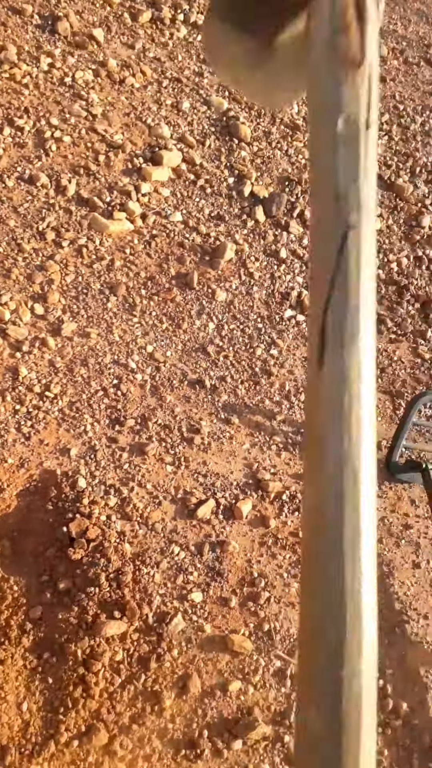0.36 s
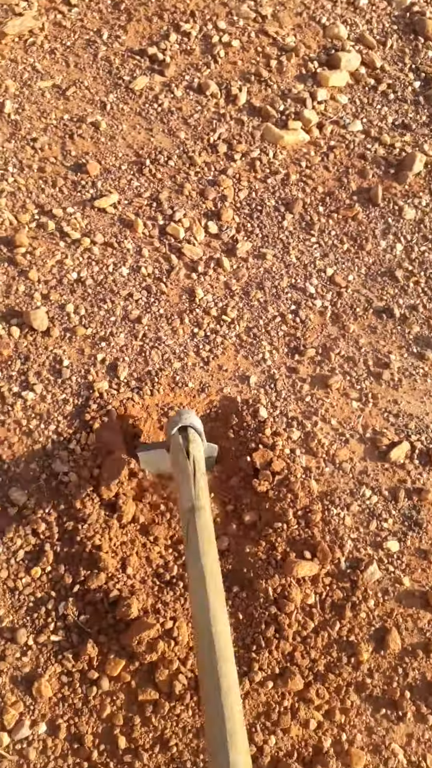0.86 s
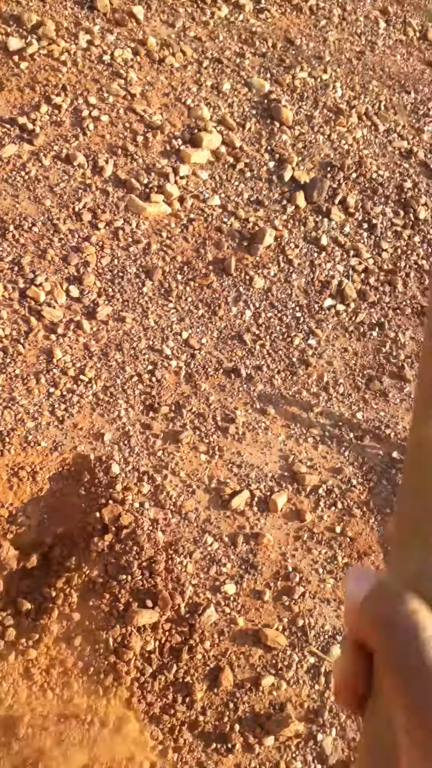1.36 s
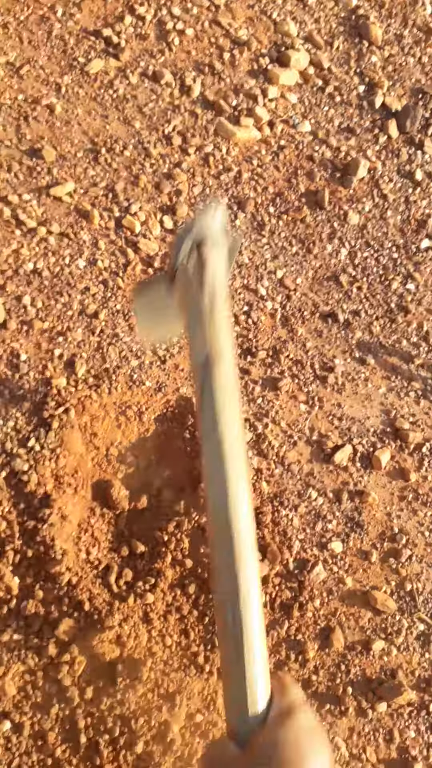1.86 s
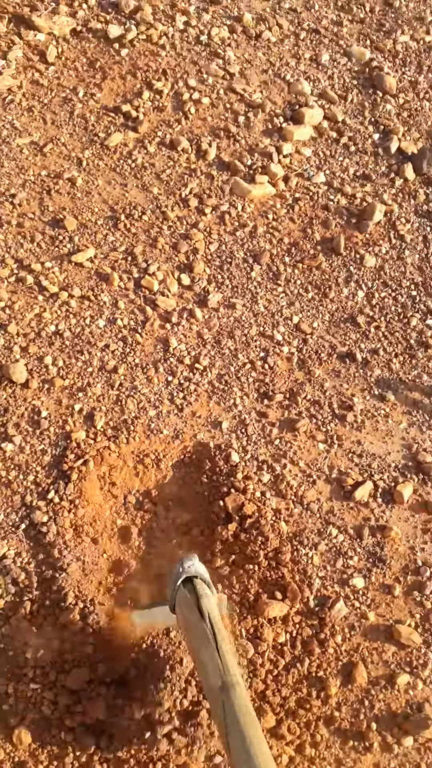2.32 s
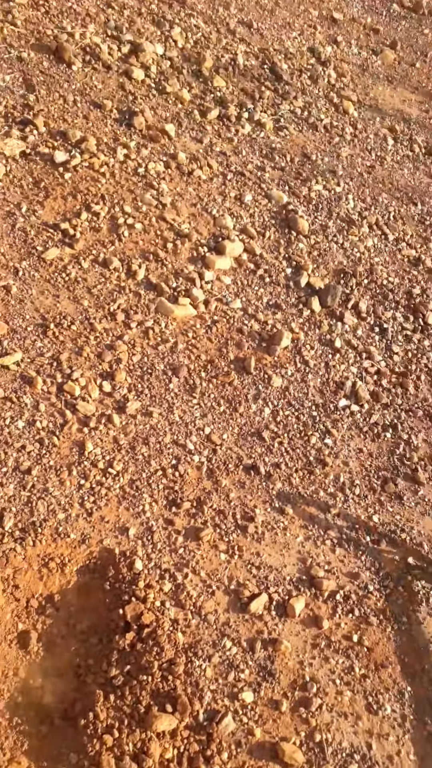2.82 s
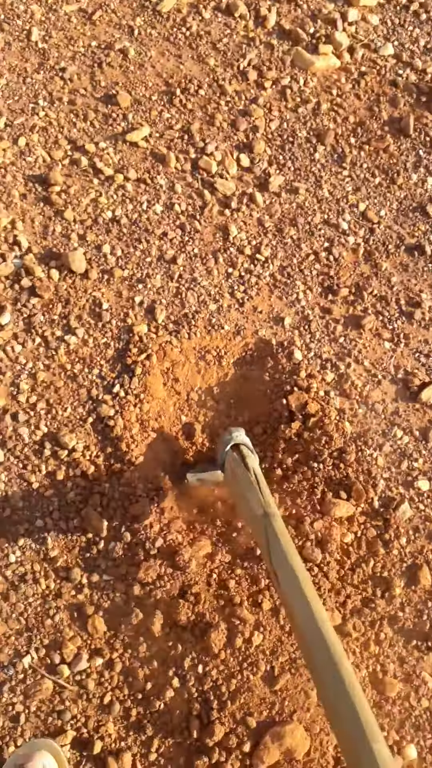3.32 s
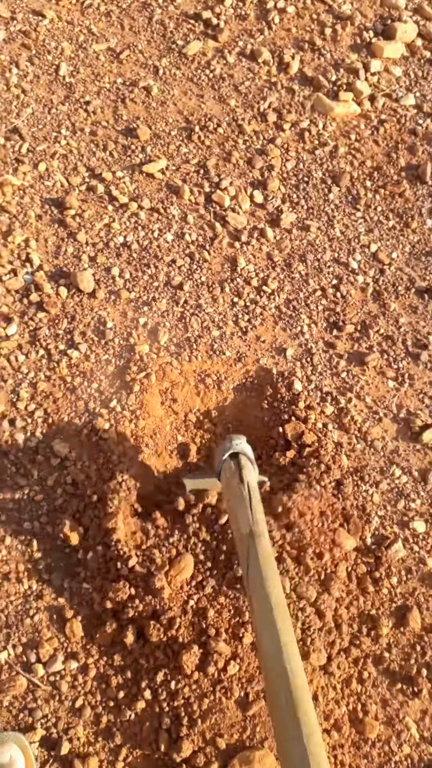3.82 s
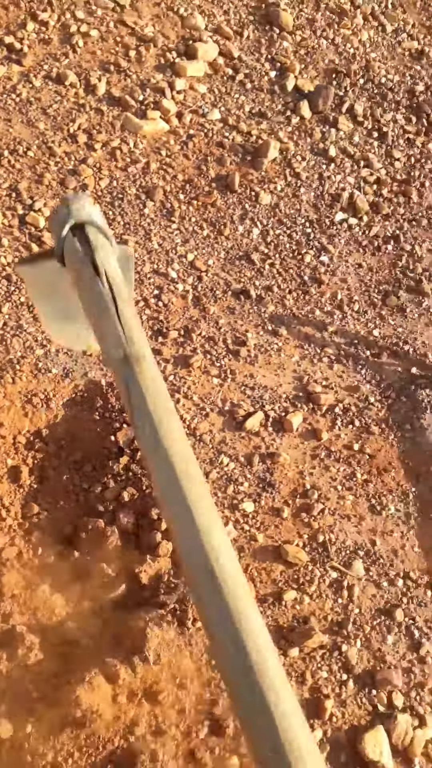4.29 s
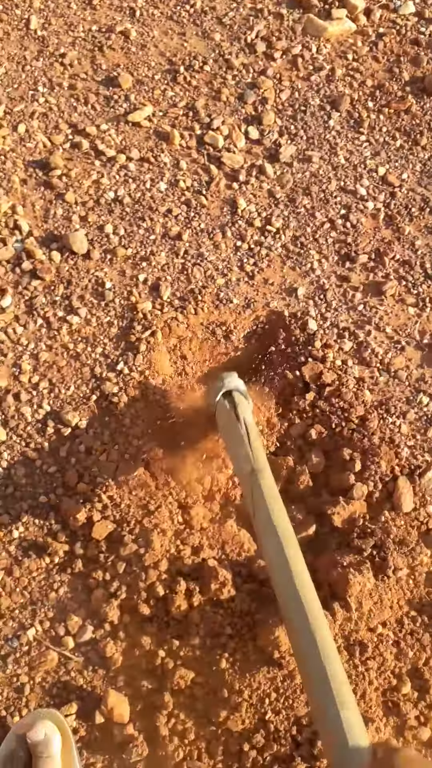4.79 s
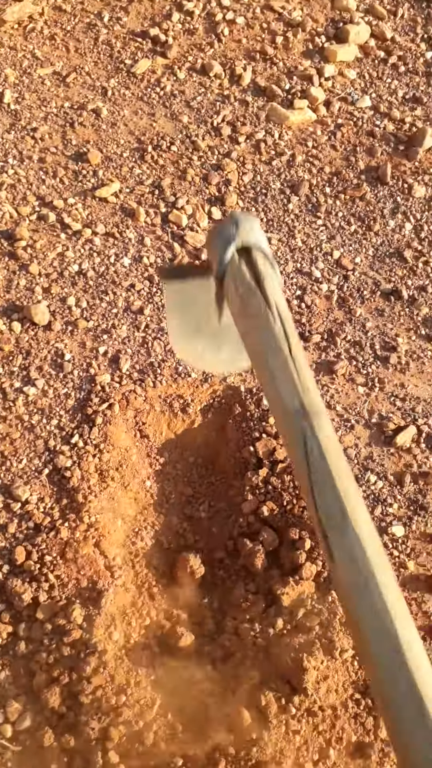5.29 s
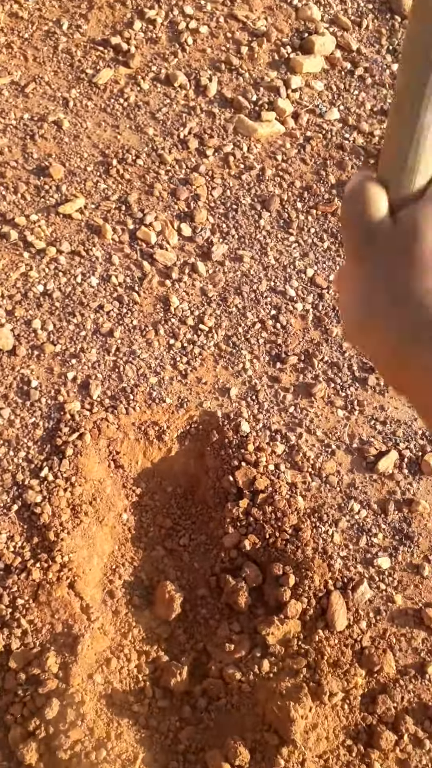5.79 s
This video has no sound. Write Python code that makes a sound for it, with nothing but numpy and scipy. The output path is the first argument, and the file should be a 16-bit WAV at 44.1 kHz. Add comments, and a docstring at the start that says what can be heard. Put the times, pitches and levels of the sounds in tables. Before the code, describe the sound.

A steel hoe chops into hard stony ground outdoors, each sharp crunch followed by scraping gravel and a patter of sand and pebbles.

```python
"""Hoe blows in stony ground

A steel hoe chops and drags through hard stony ground outdoors, close to the microphone.
Dense clicks drive resonances as stones crush and the ground knocks and thumps; decaying sines ring the blade.
Filtered and resonated clicks also make the dragged gravel, cracking stones, sand, grit and clods.
Filtered noise makes the rush of each swing and the light wind rumbling on the microphone."""
import sys
import numpy as np
from scipy import signal
from scipy.fft import rfft, irfft
from scipy.io import wavfile

SR = 44100
rng = np.random.default_rng(int(sys.argv[2]) if len(sys.argv) > 2 else 0)


def level_to_linear(level):
    """Convert decibel levels to linear amplitude factors, elementwise."""
    exponent = np.asarray(level, float) / 20
    return 10 ** exponent


def wav_record(signal):
    """Record a signal, one row per channel, as 16-bit PCM in the file named by sys.argv[1]."""
    frames = np.transpose(np.atleast_2d(signal))
    bounded = np.clip(frames, -1, 1)
    # unit amplitude maps onto the largest positive 16-bit level
    quanta = np.round(bounded * 32767).astype(np.int16)
    wavfile.write(sys.argv[1], SR, quanta)


N = 271258  # samples

# Blade bites: t/s, crush peak level/dB, crush resonance f/Hz, knock level/dB, knock f/Hz, thump level/dB
BITES = [(0.8658, -6.5, 6420, -22, 1200, -32), (1.9058, -3.5, 3830, -15.5, 900, -22),
         (3.1952, 0.5, 7850, -18.5, 800, -18), (4.6973, -8.5, 4290, -36, 587, -40),
         (4.7034, -7, 8160, -23.5, 525, -38.5), (4.7126, -7, 2690, -15, 500, -41),
         (4.7223, -8.5, 2290, -18, 1920, -42.5), (4.7316, -9.5, 3350, -21, 1090, -43),
         (4.8475, -16, 2200, -19.5, 756, -38), (4.8915, -16.5, 4464, -21, 540, -43),
         (4.8961, -9.5, 6080, -14.5, 735, -38), (4.967, -12, 2610, -36, 1920, -48),
         (5.9582, 2.5, 7700, -17, 1500, -25)]
# Spectrum of crushing stones: f/Hz, relative density level/dB
CRUSH_SPECTRUM = [(470, -22.5), (800, -13.5), (2180, -6.5), (3060, -7), (3980, 0.5), (4460, -1), (7170, -3),
                  (7930, 8.5), (9570, -14.5), (12500, -9), (16000, -27)]
BITE_RISE_S, BITE_T60_S = .0055, .018
BITE_PRESS = 2.2  # gain before limiting at 1: harder pressing holds the crush at full strength longer
CRACK_DB, CRACK_DB_PER_OCTAVE = -13, 6.0  # bright edge against the crush peak at 4 kHz; higher stone is brighter

# Blade modes in the air: f/Hz, relative level/dB, 60 dB decay t/s
BLADE_MODES = [(615, -27, 1.2), (1125, -20, .08), (1615, -5, .17), (2430, -18, .1), (3378, -17, .7),
               (3770, -12, .14), (4382, -12, .19), (4910, -16, .12), (5800, -20, .19), (6450, -14, .09),
               (8300, -15, .1), (8930, -20, .15), (10900, -18, .1), (13350, -18, .12)]
# Touches that ring the blade: t/s, level/dB, centre of struck modes f/Hz, spread/octaves,
# loss to clinging soil/dB per s
TOUCHES = [(.927, -24, 4382, 0.1, 600.), (1.945, -31, 3770, 0.041, 900.), (1.969, -19.5, 5170, 1.7, 698),
           (2.357, -38, 4382, .1, 300.), (2.39, -36, 3360, 0.087, 401), (4.039, -27, 9000, 1.1, 500.),
           (4.732, -10.5, 4010, 0.55, 1500.), (5.113, -31, 3340, 0.078, 20.), (5.136, -15, 3378, 0.06, 260),
           (5.13, -33, 9500, 1.3, 300.), (5.957, -22, 2000, 5.3, -2), (6.032, -35, 3360, 0.76, 98),
           (6.123, -41, 4400, 0.35, 52)]
SLIDING_LOSS_DB_PER_S = 901

# Single stones cracking or landing: t/s, peak level/dB, pitch f/Hz, pitch over crack level/dB
SINGLE_STONES = [(0.0174, -24, 3720, 10), (0.0932, -26, 4900, 22), (0.1226, -26, 4200, 19),
                 (0.1774, -34, 3230, -6), (0.2329, -40, 3400, 18), (0.3102, -32, 5160, -2),
                 (0.4065, -41, 11900, 3), (0.4494, -44, 11900, 0), (0.5352, -39, 12100, -12),
                 (0.6165, -41.5, 12300, -3), (0.7382, -53, 7800, -1), (0.9268, -31, 4530, 3),
                 (0.9464, -31, 4500, 17), (0.9594, -29.5, 1220, -4), (1.05, -46, 4960, 11),
                 (1.1732, -35, 4570, 0), (1.2032, -37, 4500, 19), (1.3129, -46, 5400, 3.0),
                 (1.4084, -37, 12400, 6), (1.4147, -41.5, 4380, -2), (1.43, -43.5, 6300, -1),
                 (1.9694, -34, 1740, -6), (2.0657, -42, 1190, 8), (2.1615, -27.5, 1030, 1),
                 (2.3057, -38, 4360, 4), (2.5227, -43.5, 7550, 13), (2.64, -47, 11000, -3),
                 (2.8809, -52, 4350, 6), (3.0749, -33.5, 12100, -17), (3.2494, -29, 4100, -16),
                 (3.9594, -48, 2550, 1), (4.0392, -31, 11000, 5), (4.1689, -45, 3320, 17),
                 (4.1919, -44, 5350, 11), (4.2911, -28, 6100, 30), (4.3141, -37, 5620, 21),
                 (4.3565, -40.5, 4700, 8), (4.3909, -40.5, 5900, 16), (4.7566, -21, 1930, 17),
                 (4.8064, -22, 700, 3.0), (4.9397, -25.5, 1940, 15.5), (5.1347, -34, 3460, -5),
                 (5.2979, -40, 4790, 16), (5.4176, -31, 4860, 29), (5.466, -45, 5190, 8),
                 (5.4989, -44.5, 5130, 24), (5.6042, -42.5, 8250, 4), (5.808, -56, 2500, -6),
                 (6.0332, -10, 5300, -2), (6.035, -31, 1150, 14)]
STONE_T60_S, STONE_T60_S_PER_DB = .0075, .0003  # decay at -35 dB; bigger stones crack longer
SMALL_STONES_DB, SMALL_STONES_SPREAD_DB = 4.0, 3.5  # peaks over the falling sand

# Strokes of the edge through gravel: hardest grind t/s, gravel level/dB, soil level/dB, build t/s, die t/s
STROKES = [(0.0, -38.5, -45, .01, 0.085), (.125, -46, -56.5, 0.029, 0.054),
           (0.877, -45, -44, 0.0068, 0.028), (.945, -44, -52.5, 0.04, 0.069),
           (1.918, -41.5, -35, 0.011, 0.03), (1.974, -36, -40.5, .012, 0.057), (2.1, -51.5, -52, .03, .06),
           (2.16, -46.5, -46, 0.038, 0.035), (3.21, -42, -38, .01, .05), (3.252, -47, -52, .02, .025),
           (3.85, -56, -66, .04, .1), (3.922, -39.5, -44, 0.037, 0.03), (4.05, -47, -60, .02, 0.072),
           (4.742, -33, -35, .01, .015), (4.775, -26, -37.5, 0.034, 0.044), (4.82, -34, -28, .025, .025),
           (4.847, -31.5, -29.5, 0.029, .012), (4.888, -30.5, -30, 0.017, .01), (4.908, -30, -43, .01, .03),
           (4.945, -34, -42, .01, .03), (4.986, -28, -30, .03, .016), (5.138, -48, -56, .05, .03),
           (5.97, -35, -38, 0.0079, .035), (6.04, -46, -56, .02, 0.054)]
DRAG_SPAN_DB = 15  # what a stroke gains and loses in those times
# Spectrum of grinding gravel: f/Hz, relative density level/dB
GRAVEL_SPECTRUM = [(760, -41), (1300, -20.5), (2600, -4), (3960, -11.5), (5720, -6.5), (6150, -12.5),
                   (8080, -14.5), (9360, -17.5), (16000, -22.5)]

# Loose ground thrown off the blade: thickest sand t/s, hold t/s, sand level/dB, grit level/dB,
# clods level/dB, extra rolling of clods t/s
THROWS_OFF_BLADE = [(.12, .2, -46, -50, -58, .1), (1.203, 0.072, -53, -59, -62, .05),
                    (2.3, .26, -56.5, -59.5, -61, .36), (3.36, .24, -63, -63.5, -70, .05),
                    (4.212, 0.23, -51, -57, -57.5, .3), (5.238, .22, -48, -54, -58.5, .02),
                    (6.12, 0.21, -58.5, -60, -65, .02)]
# How sand falls: lead t/s, rise/dB per s, sag during load/dB per s, fall after it/dB per s, still level/dB
SAND_DESCENT = (0, 70, 14, 85, -76)
# How grit falls: lead over sand t/s, rise/dB per s, sag/dB per s, fall/dB per s, still level/dB
GRIT_DESCENT = (0.16, 200, 24, 80, -82)
# How clods fall: lead over sand t/s, rise/dB per s, sag/dB per s, fall/dB per s, still level/dB
CLODS_DESCENT = (.14, 200, 16, 100, -82)
# Sand slipping off the raised blade: t/s, level/dB
SAND_TRICKLES = [(1.62, -68), (2.88, -64), (3.88, -60), (4.55, -62)]
TRICKLE_DB_PER_S = 110
# Spectrum of sand: f/Hz, relative density level/dB
SAND_SPECTRUM = [(2650, -29.5), (4500, -1.5), (6250, -3), (6880, -2), (9460, -6), (10200, -11), (12600, -2),
                 (16000, -4.5)]
# Spectrum of grit: f/Hz, relative density level/dB
GRIT_SPECTRUM = [(880, -49), (1500, -16), (2190, -4), (3250, -3), (3630, -4), (6070, -2.5), (7000, -9.5),
                 (9100, -41.5), (15400, -120)]
# Spectrum of clods and breaking soil: f/Hz, relative density level/dB
CLODS_SPECTRUM = [(110, -43), (180, -5), (309, -4), (472, 0.5), (833, -9), (972, -2.5), (1200, -15),
                  (1800, -19), (2340, -37), (3960, -120)]

# Downward rushes of the hoe: arrival t/s, level/dB
HOE_SWINGS = [(.86, -76), (1.9, -62), (3.18, -59.5), (4.69, -64), (5.95, -68)]
SWING_DB_PER_S = 150
# Spectrum of rushing air: f/Hz, relative density level/dB
SWISH_SPECTRUM = [(100, -30.5), (250, -4), (450, 0), (900, -8), (1500, -30), (3000, -60)]
# Wind on the microphone: t/s, level/dB
WIND_LEVELS = [(0, -39), (.03, -45), (.06, -37), (.085, -51), (.2, -60), (.4, -61), (.57, -55), (.79, -59),
               (.84, -66), (.92, -60), (1.11, -63), (1.35, -69), (1.68, -79), (2.11, -66.5), (2.33, -62),
               (2.45, -74.5), (2.56, -74), (2.65, -56), (2.76, -68), (3.02, -74), (3.08, -57), (3.25, -68),
               (3.6, -81), (4.01, -66), (4.2, -66), (4.27, -79), (4.68, -72), (4.85, -64), (5.0, -66.5),
               (5.6, -76.5), (5.84, -72), (5.885, -58.5), (5.93, -63), (6.15, -70)]
# Spectrum of wind rumble: f/Hz, relative density level/dB
WIND_SPECTRUM = [(13, -51.5), (22, -22), (58, -2.5), (97, -1), (144, -2), (194, -12.5), (300, -19),
                 (390, -54), (660, -120)]


def rms_one(x):
    """Normalisation: mean power is brought to 1."""
    return x / np.sqrt(np.mean(x ** 2) + 1e-20)


def coloured(x, spectrum):
    """Minimum phase: a folded cepstrum gives the earliest causal response; rms gain 1 for white input."""
    hz = np.maximum(np.fft.rfftfreq(4096, 1 / SR), 10)
    point_hz, point_db = np.transpose(spectrum)
    log_gain = np.interp(np.log(hz), np.log(point_hz), point_db) * np.log(10) / 20
    cepstrum = irfft(log_gain)
    cepstrum[1:2048] *= 2
    cepstrum[2049:] = 0
    response = irfft(np.exp(rfft(cepstrum)))
    return signal.fftconvolve(x, response / np.linalg.norm(response))[:len(x)]


def drift(corner_hz):
    """Low-passed chance: two equal poles leave slow fluctuation of standard deviation about 1."""
    pole = np.exp(-2 * np.pi * corner_hz * 20 / SR)  # computed at every 20th sample
    noise = rng.standard_normal(N // 20 + 2002)
    slow = signal.lfilter([1], [1, -2 * pole, pole * pole], noise)[2000:]  # settled part
    return np.interp(np.arange(N) / 20, np.arange(len(slow)), rms_one(slow))


def grains(per_s, spread_db):
    """Shot noise: random clicks of either sign, many small and a few large; rms 1."""
    sizes = level_to_linear(spread_db * np.minimum(rng.exponential(1, N), 5)) * rng.choice([-1, 1], N)
    return rms_one(sizes * (rng.random(N) < per_s / SR))


def ring(x, hz, t60):
    """Damped resonance: a unit click sets a decaying sine of initial height 1 ringing."""
    radius, angle = level_to_linear(-60 / (t60 * SR)), 2 * np.pi * hz / SR
    return signal.lfilter([0, np.sin(angle)], [1, -2 * radius * np.cos(angle), radius ** 2], x + 1e-18)


def add(out, s, burst):
    """Superposition: a burst is mixed into out from time s."""
    start = round(s * SR)
    burst = burst[max(-start, 0):N - start]
    start = max(start, 0)
    out[start:start + len(burst)] += burst


def swell(rise_s, t60):
    """Impact envelope: a quadratic rise to 1, then an exponential fall."""
    t = np.arange(round(.15 * SR)) / SR
    fall = level_to_linear(-60 * (t - rise_s) / max(t60, .002))
    return np.where(t < rise_s, (t / rise_s) ** 2, fall)


def peaked(x, hz, cycles, lift):
    """Resonant emphasis: a burst gains one resonance of 60 dB decay in cycles, then a peak of 1."""
    tone = ring(x, hz, cycles / hz)
    both = rms_one(x) + lift * rms_one(tone)
    return both / np.abs(both).max()


def arch(s, hold_s, rise_db_per_s, fall_db_per_s):
    """Exponential growth and decay: gain climbs to 1 at s, holds, and sinks again."""
    t = np.arange(N) / SR
    before, after = np.minimum(t - s, 0), np.maximum(t - s - hold_s, 0)
    return level_to_linear(rise_db_per_s * before - fall_db_per_s * after)


def pebbles(per_s, spread_db, low_hz, high_hz, cycles):
    """Size sets pitch: random contacts are dealt to 14 pebble pitches, each ringing briefly; rms 1."""
    ticks, dealt = grains(per_s, spread_db), rng.integers(0, 14, N)
    pitches = np.geomspace(low_hz, high_hz, 14)
    rings = (rms_one(ring(ticks * (dealt == k), hz, cycles / hz)) for k, hz in enumerate(pitches))
    return rms_one(sum(rings))


def buried_blade(x, flicker_db):
    """Damped forced modes: sliding grit excites now these, now those modes of the soiled steel; rms 1."""
    out = np.zeros(N)
    for hz, _, t60 in BLADE_MODES[2:]:
        damped_t60 = 60 / (60 / t60 + SLIDING_LOSS_DB_PER_S)
        out += ring(x * level_to_linear(flicker_db * drift(38)), hz, damped_t60)
    return rms_one(out)


def bite_crush(pressed, peak_db, hz):
    """Fracture noise: crushing stones favour one pitch, and steel on stone adds a bright edge."""
    bright = signal.butter(3, 9000, "high", fs=SR, output="sos")
    crack = signal.sosfilt(bright, pressed)
    crack_db = peak_db + CRACK_DB + CRACK_DB_PER_OCTAVE * np.log2(hz / 4000)
    crush = level_to_linear(peak_db) * peaked(pressed, hz, cycles=45., lift=.6)
    return crush + level_to_linear(crack_db) * crack / np.abs(crack).max()


def bite_knock(push, level_db, hz):
    """Forced resonance: a noisy push knocks handle and ground; the knock carries no deep bass."""
    handle = rms_one(ring(push, 420, .05))
    ground = 1.5 * rms_one(ring(push, hz, 8.1 / hz)) + .7 * rms_one(ring(push, 650, .0047))
    high_pass = signal.butter(2, 220, "high", fs=SR, output="sos")
    knock = signal.sosfilt(high_pass, handle + ground)
    return level_to_linear(level_db + 8.5) * knock / np.abs(knock).max()


def bite_thump(level_db):
    """Impulse response of the ground: one smooth push excites three low resonances."""
    shove = swell(BITE_RISE_S, BITE_T60_S) ** 2.2
    thump = rms_one(ring(shove, 120, .071))
    thump += 1.4 * rms_one(ring(shove, 165, .095))
    thump += .55 * rms_one(ring(shove, 240, .1))
    return level_to_linear(level_db + 8.0) * thump / np.abs(thump).max()


def blows():
    """Impact: stones crush for milliseconds, handle and ground knock, and the thump follows a moment later."""
    out, noise = np.zeros(N), rng.standard_normal(N)
    stone_noise = coloured(grains(13000, spread_db=1.5), CRUSH_SPECTRUM)
    shape = np.minimum(BITE_PRESS * swell(BITE_RISE_S, BITE_T60_S), 1)
    for s, peak_db, hz, knock_db, knock_hz, thump_db in BITES:
        start = round(s * SR)
        piece = slice(start, start + len(shape))
        add(out, s - .004, bite_crush(stone_noise[piece] * shape, peak_db, hz))
        add(out, s - .004, bite_knock(noise[piece] * shape, knock_db, knock_hz))
        add(out, s + .0015, bite_thump(thump_db))
    return out


def blade():
    """Modal excitation: each touch rings the modes near its pitch most; soil on the steel adds loss."""
    out, t = np.zeros(N), np.arange(round(.4 * SR)) / SR
    for s, db, centre_hz, octaves, loss_db in TOUCHES:
        for hz, level_db, t60 in BLADE_MODES:
            distance = np.log2(hz / centre_hz) / octaves
            start_db = db + level_db - 6 * distance ** 2
            decay = level_to_linear(start_db - (60 / t60 + loss_db) * t)
            add(out, s, decay * np.sin(2 * np.pi * hz * t))
    return out


def stones(rows):
    """Brittle fracture: each stone is a short, broad puff of cracks that rings at its own pitch."""
    out = np.zeros(N)
    cracks = signal.lfilter([1, -1], [1, -.75], grains(18000, spread_db=7.5))
    cracks = np.r_[cracks, cracks[:SR]]  # room for late stones
    for s, peak_db, hz, pitch_db in rows:
        start = round(s * SR)
        shape = swell(.0012, STONE_T60_S + STONE_T60_S_PER_DB * (peak_db + 35))
        puff = cracks[start:start + len(shape)] * shape
        body = .5 * rms_one(puff) + rms_one(ring(puff, hz, 3.3 / hz))  # weight gathers around the pitch
        add(out, s - .0012, level_to_linear(peak_db) * peaked(body, hz, cycles=34.0, lift=level_to_linear(pitch_db)))
    return out


def small_stones(sand_gain, count):
    """Random arrivals: small stones land at chance moments, with peaks tied to the falling sand."""
    when, size, pitch, tone = rng.random((count, 4)).T
    s = when * (N - 1) / SR
    sand_db = 20 * np.log10(sand_gain[(s * SR).astype(int)])
    peak_db = sand_db + SMALL_STONES_DB - SMALL_STONES_SPREAD_DB * np.log(1 - .97 * size)
    return list(zip(s, peak_db, 4000 * 3.2 ** pitch, 9 * tone - 6))  # columns of SINGLE_STONES


def drags():
    """Friction as many impacts: gravel grinds in clumps under the edge while soil breaks below it."""
    gravel_gain, soil_gain = np.zeros((2, N))
    for s, gravel_db, soil_db, build_s, die_s in STROKES:
        stroke = arch(s, 0, DRAG_SPAN_DB / max(build_s, .002), DRAG_SPAN_DB / max(die_s, .002))
        gravel_gain += level_to_linear(gravel_db) * stroke
        soil_gain += level_to_linear(soil_db) * stroke
    grind = coloured(grains(4600, spread_db=3.5), GRAVEL_SPECTRUM)
    chips = pebbles(5000, 3.0, 1700, 9000, cycles=50.)
    gravel = rms_one(grind) + 2.0 * chips + 1.3 * buried_blade(grind, flicker_db=3.0)
    gravel = gravel * level_to_linear(4.5 * drift(70))
    soil = coloured(grains(2500, spread_db=3.0), CLODS_SPECTRUM) * level_to_linear(3.5 * drift(60))
    return gravel_gain * rms_one(gravel) + soil_gain * rms_one(soil)


def falling(column, descent, rolls=False):
    """Power addition: each throw of one size rises, sags while it lasts, then thins out."""
    lead_s, rise, sag, sink, still_db = descent
    power = level_to_linear(still_db) ** 2
    for row in THROWS_OFF_BLADE:
        end_s = row[0] + row[1] + rolls * row[5]
        load = level_to_linear(row[column]) * arch(row[0] - lead_s, 0, rise, sag) * arch(end_s, 0, 0, sink)
        power = power + load ** 2
    return np.sqrt(power)


def falling_sand():
    """Superposed gains: thrown sand falls and trickles slip off the raised blade."""
    gain = falling(2, SAND_DESCENT)
    for s, db in SAND_TRICKLES:
        gain = gain + level_to_linear(db) * arch(s, .04, TRICKLE_DB_PER_S, TRICKLE_DB_PER_S)
    return gain


def sand():
    """Dense shot noise: fine sand hisses, with thin bright ticks and tiny clinks; rms 1."""
    patchy = level_to_linear(3.0 * drift(30))
    hiss = grains(9000, spread_db=6.0) * patchy + .9 * grains(280, spread_db=4.0)
    clinks = pebbles(1200, 3.0, 5500, 14500, cycles=60.)
    return rms_one(rms_one(coloured(hiss, SAND_SPECTRUM)) + .4 * clinks)


def grit():
    """Modulated shot noise: grit patters down in clumps, clinks, and slides off the steel; rms 1."""
    hits = grains(7600, spread_db=3.5) + .58 * grains(200, spread_db=2.5)
    patter = coloured(hits, GRIT_SPECTRUM) * level_to_linear(4.6 * drift(36))
    clinks = pebbles(1500, 3.0, 2400, 7500, cycles=45.)
    return rms_one(rms_one(patter) + .5 * clinks + .096 * buried_blade(patter, flicker_db=7.5))


def clods():
    """Low-pitched shot noise: falling clods make dull impacts whose level drifts; rms 1."""
    return rms_one(coloured(grains(3000, spread_db=3.0), CLODS_SPECTRUM) * level_to_linear(1.8 * drift(30)))


def swings():
    """Flow noise: air rushes round handle and blade, louder up to the blow."""
    rush = sum(level_to_linear(db) * arch(s, 0, SWING_DB_PER_S, 2000) for s, db in HOE_SWINGS)
    return rush * coloured(rng.standard_normal(N), SWISH_SPECTRUM)


def wind():
    """Turbulent pressure: low-frequency noise of wavering level presses on the microphone itself."""
    rumble = rms_one(coloured(rng.standard_normal(N), WIND_SPECTRUM) * level_to_linear(3.8 * drift(18)))
    s, db = np.transpose(WIND_LEVELS)
    return level_to_linear(np.interp(np.arange(N) / SR, s, db)) * rumble


def scene():
    """Superposition: blows, steel, stones, drags, falling ground and swings add to the wind."""
    sand_gain = falling_sand()
    loose = sand_gain * sand()
    loose += falling(3, GRIT_DESCENT) * grit()
    loose += falling(4, CLODS_DESCENT, rolls=True) * clods()
    all_stones = stones(SINGLE_STONES + small_stones(sand_gain, count=260))
    ground = blows() + blade() + all_stones + drags() + loose + swings()
    # small sources radiate no deep bass
    ground = signal.sosfilt(signal.butter(4, 65, "high", fs=SR, output="sos"), ground)
    return (ground + wind())[None]


def band_limit(x):
    """A steep low-pass at the top of the band."""
    return signal.sosfilt(signal.butter(12, 16400, fs=SR, output="sos"), x)


def record(dry):
    """Band limit and saturation: the microphone cuts the very top; peaks stop at full scale."""
    cut = signal.sosfilt(signal.cheby2(14, 50, 16300, fs=SR, output="sos"), dry)
    mix = np.clip(cut, -1, 1)
    return band_limit(mix)


dry = scene()
out = record(dry)
wav_record(out)
```